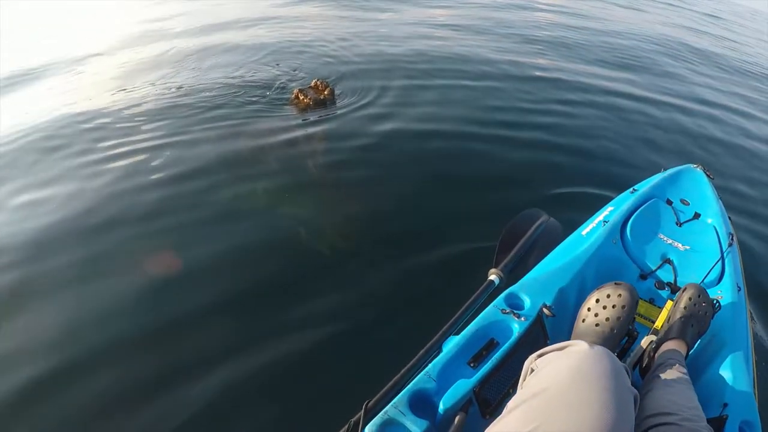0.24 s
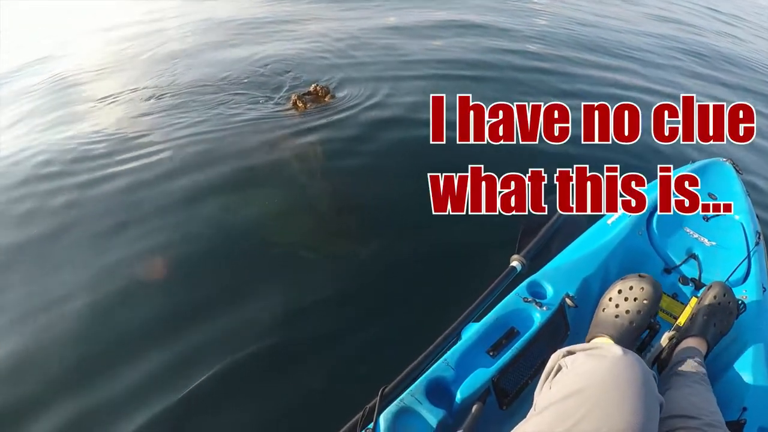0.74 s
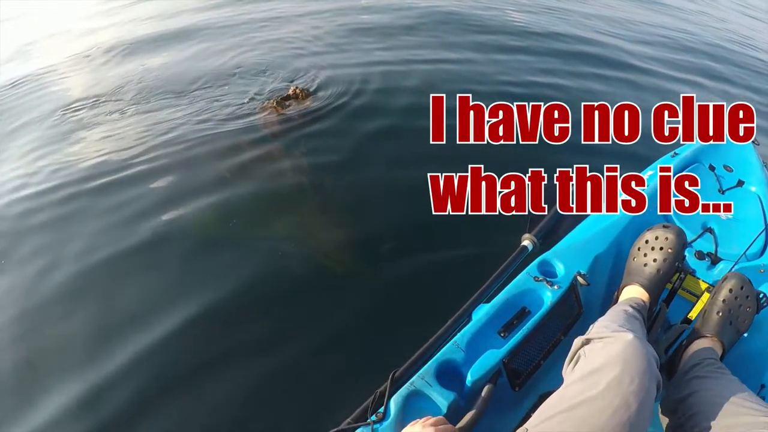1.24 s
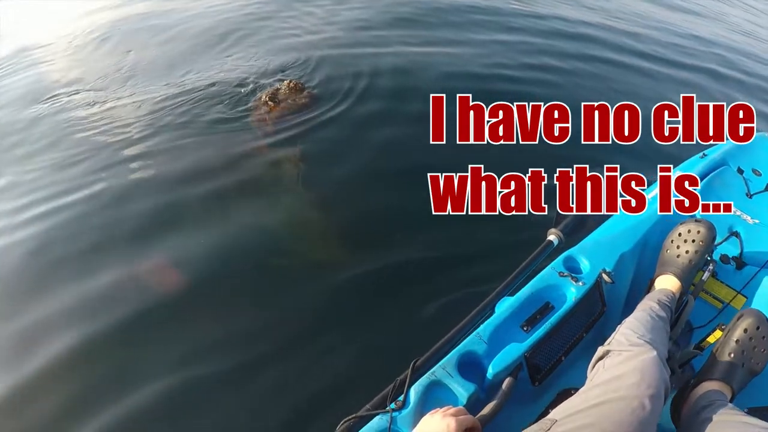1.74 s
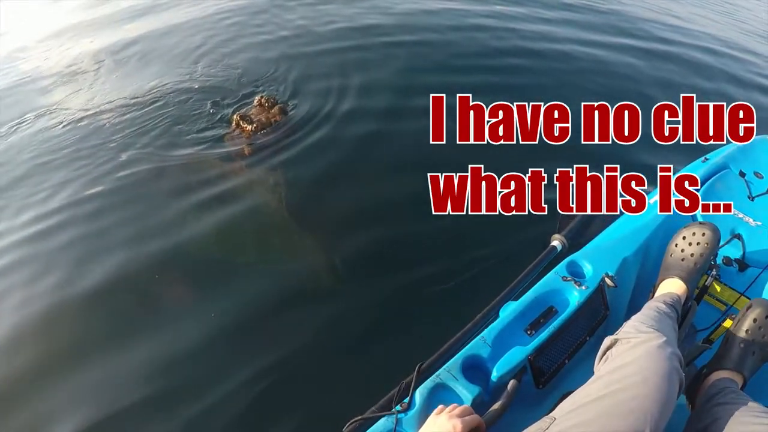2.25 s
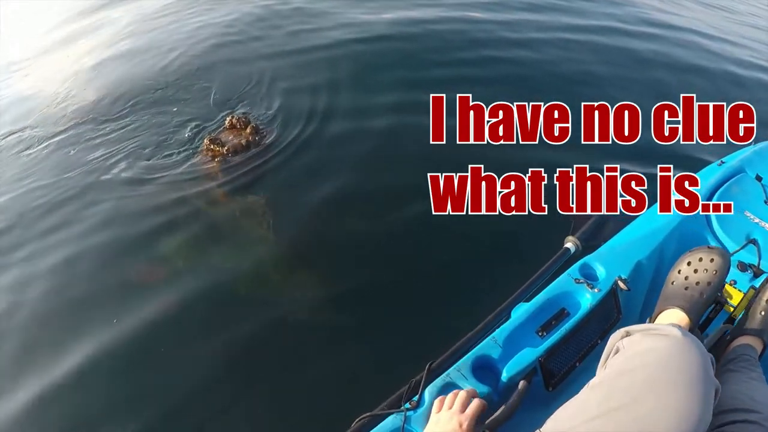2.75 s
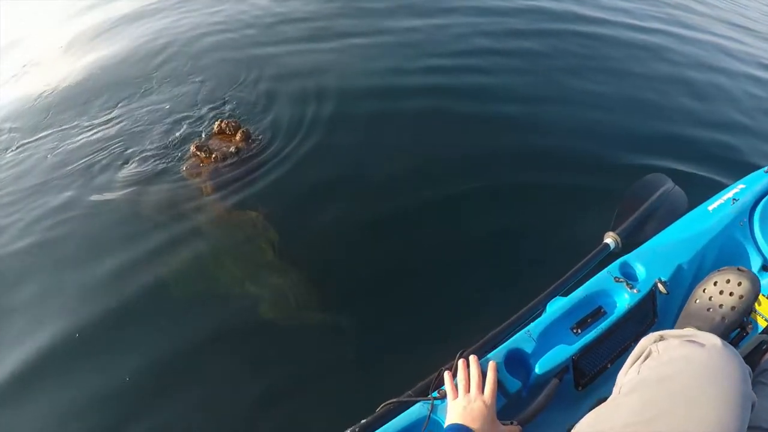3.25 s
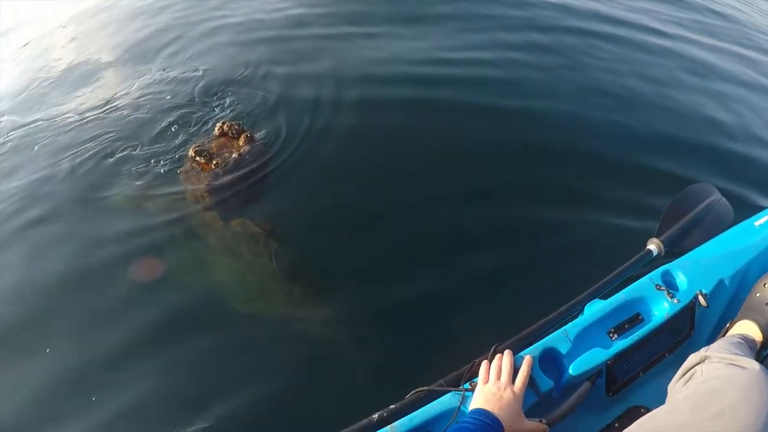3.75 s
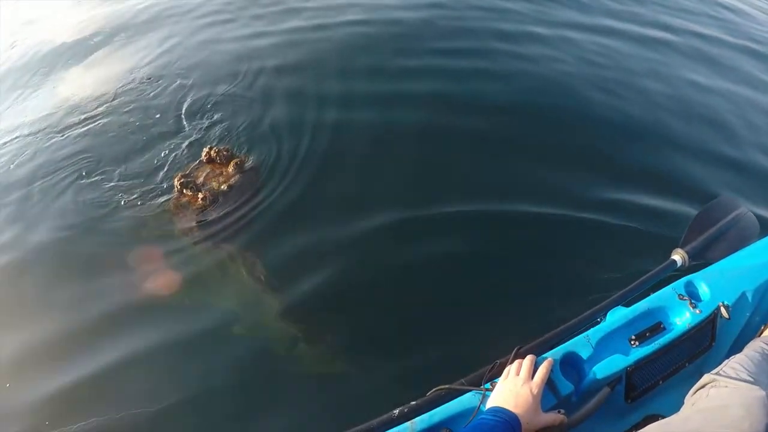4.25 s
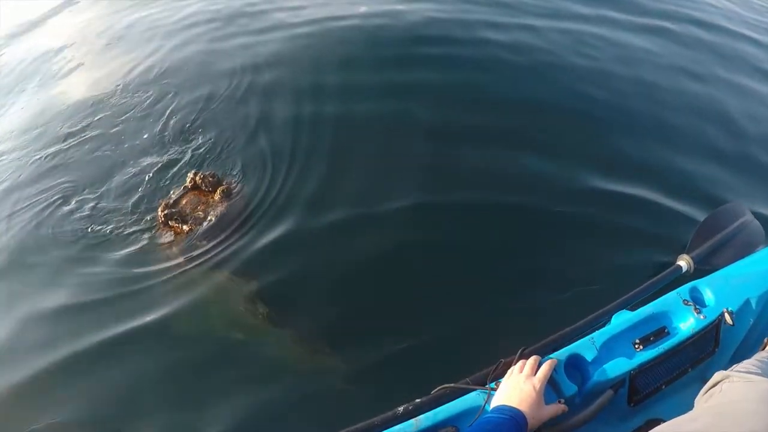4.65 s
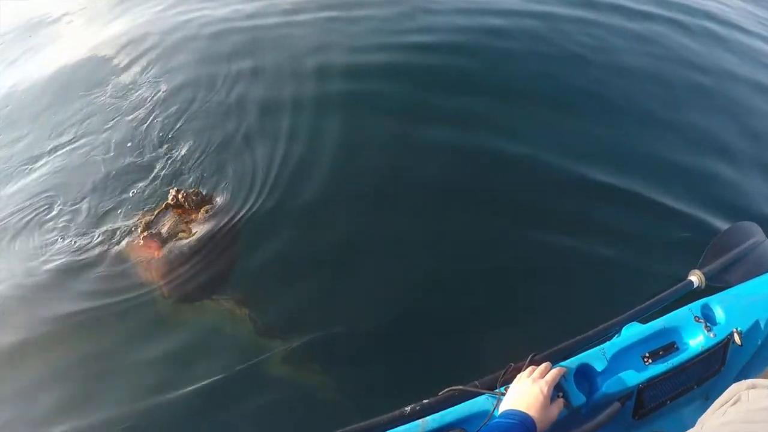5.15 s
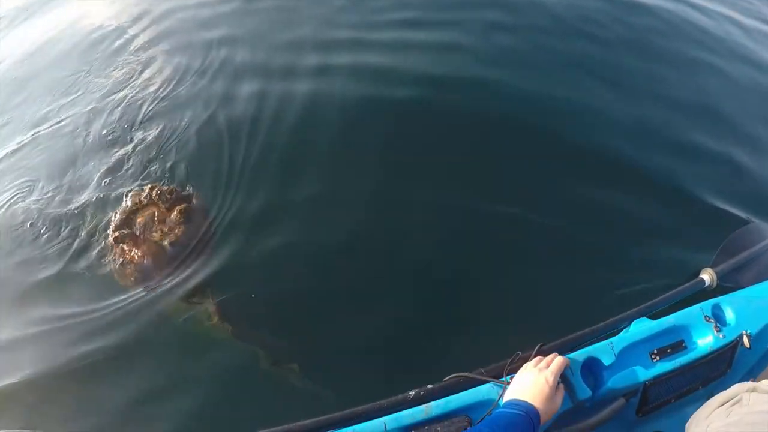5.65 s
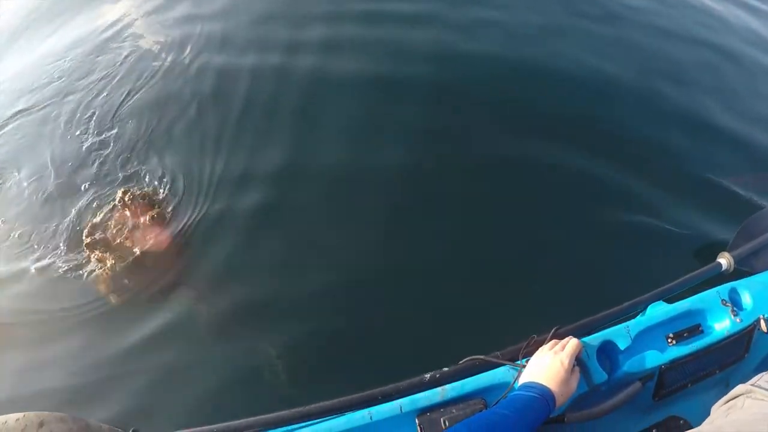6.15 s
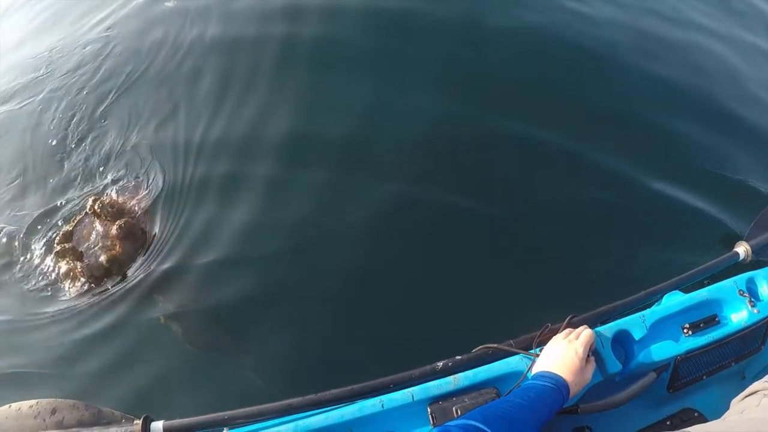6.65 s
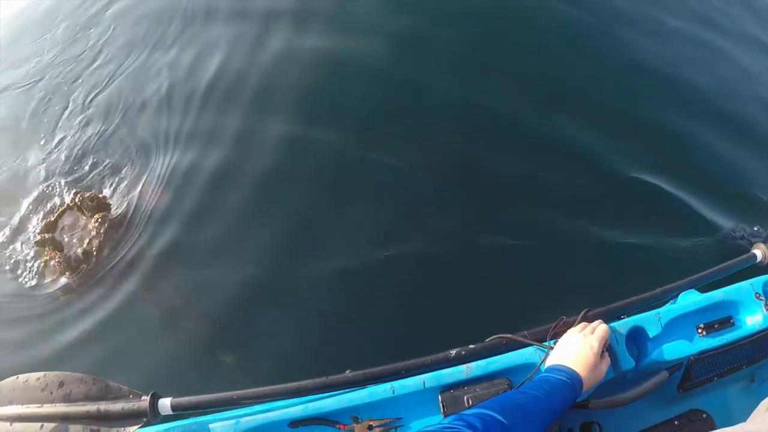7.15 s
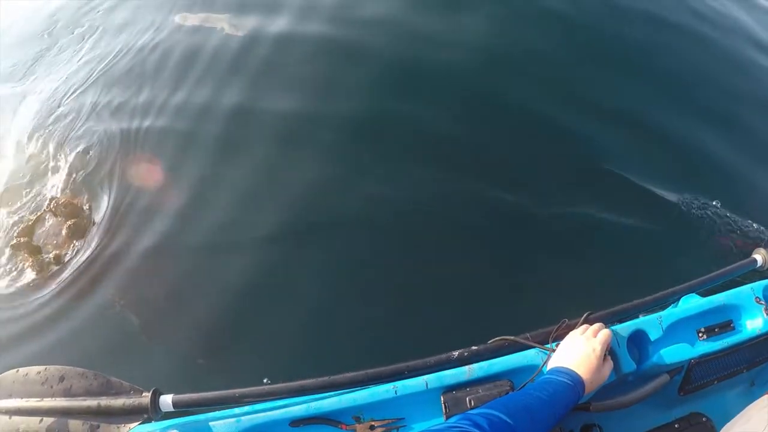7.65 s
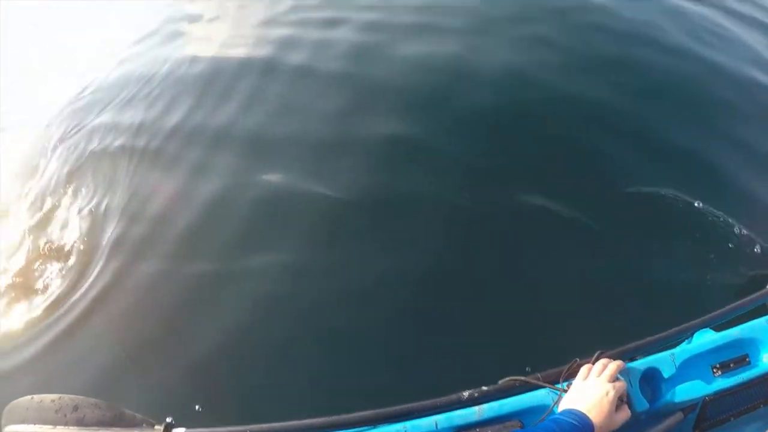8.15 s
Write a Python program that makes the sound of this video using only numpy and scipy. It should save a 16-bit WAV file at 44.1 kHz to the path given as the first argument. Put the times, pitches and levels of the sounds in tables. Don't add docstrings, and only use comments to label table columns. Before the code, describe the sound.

Throughout, soft microphone hiss lies under close water noise: low hollow booms around a plastic hull, soft slaps, gurgling and tiny bubbles. From 0.05 to about 0.4 s a strap drags in quickening scrapes. Fine spray ticks near 1 s, and two plastic taps come at about 1.3 s. Strong thumps follow near 1.8-2 s; the seat creaks from 2.14 s and breaks loose with a loud crack at 2.2 s, with tiny squeaks. From 2.5 to 3.1 s strap slips chatter rapidly and fuse into a rub. Around 3.8 s gear knocks with a hard slap, then a buckle stutters at 3.9-4 s over a heavy boom. A short rising wet-rubber squeak comes at 4.5 s, a double knock at 4.64 s. Afterwards water dominates: glugs from 5.4 s, drips and splashes around 6-7 s, a sharp slap near 7.7 s, then trickling to the end at about 8.4 s.

```python
import sys
import numpy as np
from scipy import signal
from scipy.fft import rfft, irfft
from scipy.io import wavfile
from scipy.ndimage import uniform_filter1d

SR = 44100
rng = np.random.default_rng(int(sys.argv[2]) if len(sys.argv) > 2 else 0)


def voltage_ratio(decibels):
    exponent = np.asarray(decibels, float) / 20
    return 10 ** exponent


def persist_wave(psi):
    counts = np.round(np.clip(psi, -1, 1) * 32767).astype(np.int16)
    wavfile.write(sys.argv[1], SR, np.atleast_2d(counts).T)


N = 370440

# (frequency [Hz], left lead [rad])
PORT_PHASE = [(60, 0), (340, .6), (1460, 0), (2400, .4), (3100, 2.4), (5200, 5), (7200, 6.5)]
# (frequency [Hz], left over right [dB])
PORT_DB = [(60, -2), (170, -2), (500, 3), (900, 2.5), (2450, -.5), (4200, -4.5), (7000, -1.)]


def evened(x):
    return x / np.sqrt(np.mean(x ** 2) + 1e-20)


def read(points, hz):
    f, value = np.transpose(points)
    return np.interp(np.log(hz + 1), np.log(f + 1), value)


def curve(rows):
    return np.interp(np.arange(N) / SR, *np.transpose(rows))


def add(mix, s, sound):
    part = mix[..., round(s * SR):][..., :sound.shape[-1]]
    part += sound[..., :part.shape[-1]]


def coloured(x, spectrum):
    hz = np.fft.rfftfreq(x.shape[-1], 1 / SR)
    return irfft(rfft(x) * voltage_ratio(read(spectrum, hz)), x.shape[-1])


def body(x, modes, widen=0.76):
    out = 0
    for k, (hz, width, db) in enumerate(modes):
        r = np.exp(-np.pi * abs(width * widen) / SR)
        turn = 2 * np.pi * hz / SR
        ring = signal.lfilter([(1 - r) * np.sin(turn)], [1, -2 * r * np.cos(turn), r * r], x)
        out = out + (-1) ** k * voltage_ratio(db) * ring
    return out


def ports(x, other, same, phase=PORT_PHASE, balance=PORT_DB):
    hz = np.fft.rfftfreq(N, 1 / SR)
    same = np.clip(same, 0, 1)
    half = voltage_ratio(read(balance, hz) / 2) * np.exp(.5j * read(phase, hz))
    right = same * x + np.sqrt(1 - same ** 2) * other
    return np.array([irfft(rfft(x) * half, N), irfft(rfft(right) / half, N)])


def blows(table, rise, stretch):
    out = np.zeros(N)
    for s, db, hz, length in table:
        size = stretch * max(length, 1.33 / hz)
        u = np.arange(-size, 5 * size, 1 / SR) / size
        swell = (1 + u) ** 2 * np.exp(-2 * u)
        turns = hz * size * (u + rise * u ** 2 / 2) + rng.random()
        add(out, max(s - size, 0), voltage_ratio(db) * swell * np.sin(2 * np.pi * turns))
    return out


def lumps(per_s, spread_db):
    place, size, sign = rng.random((3, 2, round(per_s * N / SR)))
    push = voltage_ratio(spread_db * np.minimum(-np.log(1 - size), 4)) * np.sign(sign - .5)
    out = np.zeros((2, N))
    np.put_along_axis(out, (place * N).astype(int), push, 1)
    return out


def booms():
    # (time of the peak [s], peak level [dB], pitch [Hz])
    thumps = [(0.299, -25.5, 101), (0.588, -26, 113.4), (0.824, -34, 96.7), (0.883, -27, 108),
              (1.299, -38, 141), (1.778, -22.5, 96), (1.976, -21.5, 99.6), (2.201, -27, 129.3),
              (2.248, -24, 99.7), (2.315, -23.5, 90.8), (3.054, -25, 113.3), (3.098, -27, 90),
              (3.221, -24.5, 113.7), (3.415, -24, 114.3), (3.466, -28.5, 130.7), (3.511, -25.5, 115),
              (3.832, -34, 109.4), (3.875, -27.5, 100.4), (3.996, -17.5, 94), (4.289, -22.5, 97.8),
              (4.477, -26.5, 89), (4.626, -24, 94.8), (4.683, -31.5, 115.4), (5.515, -24, 100),
              (6.373, -20.5, 87.2), (6.525, -30, 113.7), (6.568, -24, 104), (6.839, -28, 90),
              (7.552, -31.5, 114.5), (7.755, -24.5, 92)]
    return [(s, db, hz, 0.016 * voltage_ratio(0.62 * (-25.5 - db))) for s, db, hz in thumps]


def slaps():
    # (time of the peak [s], peak level [dB], length [s])
    hits = [(0.267, -35, 0.034), (0.583, -26.5, 0.021), (0.872, -28, 0.034), (1.752, -30.5, 0.0098),
            (1.934, -25, 0.017), (2.035, -30, 0.01), (2.2, -27.5, 0.0065), (2.241, -23, 0.017),
            (3.018, -30, 0.014), (3.195, -25, 0.024), (3.23, -25, 0.014), (3.402, -23, 0.0022),
            (3.441, -24, 0.021), (3.819, -17, 0.0094), (3.953, -30, 0.033), (3.988, -16.5, 0.0034),
            (4.261, -29.5, 0.017), (4.433, -24, 0.021), (4.605, -28, 0.0094), (4.658, -22, 0.0092),
            (5.463, -25.5, 0.014), (5.697, -24.5, 0.0092), (6.327, -28, 0.0063), (6.509, -22.5, 0.012),
            (6.587, -28, 0.015), (6.598, -30.5, 0.0034), (6.841, -25, 0.019), (7.732, -19, 0.005),
            (7.756, -22, 0.013)]
    return [(s, db, 187.6 + 90 * np.exp(-length / 0.0051), length) for s, db, length in hits]


def stirred(lag):
    power = (blows(booms(), 0, 0.93) + 2 * blows(slaps(), 0, 1.0)) ** 2
    keep = np.exp(-1 / (lag * SR))
    return np.sqrt(signal.lfilter([1 - keep], [1, -keep], power)) / voltage_ratio(-10)


def hull():
    # (time [s], gurgle level [dB])
    gurgle = [(0.0, -51), (0.33, -50), (0.82, -47.5), (1.12, -57.5), (2.03, -54), (2.42, -57), (2.74, -44),
              (3.11, -53.5), (3.34, -50.5), (4.49, -47.5), (4.91, -50.5), (5.52, -45), (5.96, -48),
              (6.36, -44.5), (6.95, -51.5), (7.37, -53.5), (8.24, -46.5), (8.4, -56.5)]
    # (frequency [Hz], width [Hz], level [dB])
    hollow = [(86.6, 19.8, -1), (133.3, 18, -3.5), (59, 88, -16.5)]
    # (frequency [Hz], width [Hz], level [dB])
    pockets = [(156.8, 143, 3), (290, 94, 2.5), (411, 216, -3), (704, 135, -7)]
    # (time of the peak [s], peak level [dB], pitch [Hz])
    glugs = [(0.862, -35.5, 690), (0.907, -32, 494), (1.528, -30, 413), (3.434, -32, 490),
             (3.751, -32.5, 740), (4.416, -38, 545), (5.414, -36.5, 500), (5.698, -37, 460),
             (5.769, -33.5, 616), (6.008, -33, 378), (6.05, -31.5, 334), (6.158, -34.5, 436),
             (6.21, -35.5, 526), (6.472, -31.5, 650), (6.517, -38, 482), (6.559, -34.5, 590),
             (7.499, -33.5, 406), (7.721, -35.5, 442), (7.975, -33.5, 704), (.491, -38.5, 706),
             (.53, -40.5, 480), (7.55, -37, 666), (7.595, -43, 560), (7.921, -37, 800)]
    # (time of the peak [s], peak level [dB], pitch [Hz], length [s])
    gulp = [
        (5.641, -26, 492, 0.02),
    ]
    # (time of the peak [s], peak level [dB], pitch [Hz], length [s])
    glides = [
        (1.549, -41, 620, 0.008),
    ]

    gurgle_db = curve(gurgle)
    hum = evened(body(body(lumps(260, 3.5)[0], hollow), hollow, widen=4.0))
    hum = voltage_ratio(-44 + 0.18 * (gurgle_db - gurgle_db.mean())) * hum
    slosh = evened(body(body(lumps(260, 2.44), pockets, widen=0.95), pockets, widen=6.07))
    slosh = voltage_ratio(gurgle_db + 3.0) * (1 + 9.4 * stirred(lag=0.006)) * slosh
    glugs = [(s, db, hz, 2.5 / hz) for s, db, hz in glugs] + gulp
    waves = blows(booms(), 0.0038, 0.94) + blows(slaps(), 0.0067, 0.43)
    waves = waves + blows(glugs, 0.2, 0.9) + blows(glides, 0.44, 0.89)
    return ports(hum + waves, hum + waves, 1) + ports(*slosh, 0.55)


def laps():
    # (time of the peak [s], peak level [dB], pitch [Hz])
    soft = [(0.07, -39.5, 90), (0.161, -47, 192), (0.378, -37.5, 90), (0.63, -30.5, 108), (.76, -37.5, 290),
            (0.802, -35, 186), (0.821, -39.5, 310), (0.927, -42, 298), (1.131, -42, 533),
            (1.351, -33.5, 142.7), (1.442, -34, 103.3), (1.537, -38.5, 435), (2.171, -41, 335),
            (2.285, -29.5, 197), (3.266, -29, 107.7), (3.347, -39, 262), (3.485, -31, 178),
            (3.544, -39, 128.5), (3.857, -35.5, 156.5), (4.059, -31, 115), (4.166, -39.5, 385),
            (4.334, -42.5, 298), (4.383, -27, 129), (4.452, -28.5, 147), (4.56, -32.5, 102.3),
            (4.808, -41.5, 101.8), (4.988, -36.5, 253), (5.23, -35, 323), (5.33, -33.5, 124),
            (5.487, -30, 140.4), (5.595, -37.5, 510), (5.671, -30, 105), (5.727, -29.5, 105.8),
            (5.758, -43.5, 106.4), (5.844, -37.5, 105.4), (5.845, -41.5, 534), (6.118, -31.5, 290),
            (6.19, -37, 322), (6.426, -27, 85.7), (6.709, -43, 464), (6.873, -36.5, 304), (6.889, -32, 90),
            (6.998, -33.5, 82.3), (7.786, -28.5, 120), (7.831, -42, 124), (8.013, -32.5, 95),
            (8.165, -35.5, 114.3), (8.335, -40, 622)]
    ring = blows([(*row, 0.024) for row in soft], 0.055, 0.7)
    return ports(ring, ring, 1)


def bubble(hz, cycles, rise):
    u = np.arange(2400) / SR * hz / cycles
    tone = np.sin(2 * np.pi * cycles * (u + rise * u ** 2 / 2))
    return tone * (1 - np.exp(-u / 0.018)) * np.exp(-2.5 * u) * 2.45


def trickle():
    # (frequency [Hz], level per Hz [dB])
    spectrum = [(260, -36.5), (450, -2.5), (886, -15), (1110, -18), (2000, -21.5), (7000, -46), (9100, -72),
                (15400, -120)]
    # (time [s], level [dB])
    runoff = [(0, -57.5), (.6, -53), (1.2, -53.5), (2.03, -72), (2.7, -54.5), (3.3, -55.5), (3.43, -47),
              (3.65, -50), (5.0, -53), (6.2, -45), (7.1, -52), (8.4, -44.5)]
    out = np.zeros((2, N))
    for hz in np.geomspace(500, 5200, num=16):
        cycles = rng.uniform(3, 14)
        grain = bubble(hz, cycles, rng.uniform(0, 0.2))[:round(4 * SR * cycles / hz)]
        grain = grain * voltage_ratio(read(spectrum, hz)) * hz ** 1.164
        out += signal.oaconvolve(lumps(85, 4.2), grain[None], axes=1)[:, :N]
    flurries = uniform_filter1d(rng.standard_normal(N), size=500)
    flurries = evened(uniform_filter1d(flurries, size=500))
    flow = voltage_ratio(curve(runoff) + 2.5) * (1 + 1.6 * stirred(lag=0.0086))
    return ports(*(flow * evened(voltage_ratio(2.1 * flurries) * out)), 0.05)


def plips():
    # (time [s], peak level [dB], pitch [Hz])
    pops = [(.36, -41, 1500), (0.421, -47.5, 800), (.529, -45, 950), (.652, -42.5, 756), (0.74, -51, 1860),
            (.787, -51, 1800), (0.807, -58, 1900), (.856, -47.5, 1090), (0.994, -44.5, 2150),
            (1.027, -49, 1820), (1.207, -50, 2240), (1.383, -48.5, 3130), (1.432, -42, 1910),
            (1.446, -36.5, 2740), (1.535, -38, 3680), (1.614, -46.5, 2330), (1.902, -48, 2160),
            (3.141, -44.5, 1670), (3.144, -43.5, 2800), (3.2, -45, 1440), (3.263, -47.5, 3300),
            (3.284, -48, 1870), (3.32, -48, 2750), (3.392, -42.5, 2050), (3.654, -45.5, 2000),
            (4.22, -50, 3500), (4.319, -49.5, 1730), (4.405, -50, 1500), (4.813, -42, 2180),
            (4.866, -51.5, 1320), (4.889, -50.5, 2600), (4.915, -49, 2650), (5.092, -47, 1004),
            (5.139, -52, 2130), (5.669, -46, 1980), (5.737, -39.5, 2690), (5.764, -45.5, 2100),
            (5.833, -47, 2750), (5.845, -52, 1250), (5.925, -43, 1910), (5.962, -43.5, 3080),
            (6.146, -44.5, 1550), (6.388, -51, 2340), (6.425, -42.5, 2440), (6.514, -40, 2370),
            (6.697, -45, 1900), (6.93, -42, 2090), (6.958, -46, 1250), (7.08, -47, 3050),
            (7.119, -40, 1520), (7.283, -42, 2580), (7.4, -41.5, 1600), (7.581, -41, 1300),
            (7.833, -54, 2010), (8.136, -45.5, 1150), (8.272, -36.5, 2460), (8.286, -39.5, 1140)]
    out, t = np.zeros((2, N)), np.arange(2400) / SR
    for s, db, hz in pops:
        fizz = body(rng.standard_normal(2400) * np.exp(-t / 0.0027), [(hz, 1500, 0)])
        pop = bubble(hz, 12, 0.012) + .5 * fizz / abs(fizz).max()
        add(out, s, voltage_ratio(db + np.array([[1], [-1]]) * rng.uniform(-2, 2)) * pop)
    return out


def drips():
    # (time [s], peak level [dB], pitch [Hz], left over right [dB])
    drops = [(1.1162, -39.5, 1410, 3), (1.417, -46, 1860, 1), (1.567, -32.5, 1118, 5.5),
             (3.5755, -44, 1120, 8), (3.017, -47, 4100, 3), (5.678, -42.5, 985, -1),
             (5.718, -40.5, 1066, -14), (5.8988, -50, 970, 11), (6.0237, -41, 1780, -9),
             (6.2065, -42.5, 1090, -21), (6.252, -43, 2050, 6), (6.488, -41.5, 1530, 7),
             (6.559, -43.5, 1300, 15), (6.604, -37.5, 907, 13), (6.6708, -42.5, 1020, 8),
             (6.775, -44, 1010, 19), (6.834, -40.5, 2050, 8.5), (7.348, -41.5, 3370, -2),
             (7.454, -41.5, 1740, 1), (7.4886, -39.5, 1430, 8.5), (7.5196, -42, 1640, 3),
             (8.2486, -38.5, 1900, 0), (8.36, -37, 933, -13)]
    out, t = np.zeros((2, N)), np.arange(2400) / SR
    for s, db, hz, pan_db in drops:
        tick = body(rng.standard_normal(2400) * np.exp(-t / 0.0041), [(1.7 * hz, 1800, 0)])
        tick = .75 * tick / abs(tick).max()
        add(out, s, voltage_ratio(db + np.array([[.5], [-.5]]) * pan_db) * (bubble(hz, 16.4, 0.077) + tick))
    return out + blows([(6.772, -36.5, 2560, .005)], -0.2, 1)


def spray():
    # (time of the peak [s], peak level [dB], length [s])
    splashes = [(0.923, -35, 0.0007), (0.938, -40.5, 0.0095), (1.01, -32.5, 0), (1.418, -41.5, 0.0033),
                (1.432, -49, 0.054), (1.508, -41, .0063), (1.526, -42.5, 0.036), (1.68, -42.5, 0.0083),
                (5.385, -36.5, 0.008), (5.359, -38, 0), (5.334, -43.5, 0.0032), (5.688, -41, 0.0058),
                (5.875, -40.5, 0.0016), (6.001, -45.5, 0.04), (6.604, -36.5, 0.014), (6.762, -29, 0),
                (6.768, -36, 0), (6.786, -39.5, .012), (6.794, -49, 0.027), (6.841, -33.5, 0.0039),
                (6.675, -42.5, 0.0034), (6.494, -52, 0.028), (6.554, -49, 0.023), (7.623, -45, .012),
                (7.965, -48, .02), (8.05, -47, 0.008), (8.164, -48, 0.033), (8.355, -42, 0.0054),
                (8.199, -35.5, 0.0031), (8.29, -44, 0.028), (3.397, -43.5, 0.012)]
    out, t = np.zeros((2, N)), np.arange(2400) / SR
    for s, db, length in splashes:
        hz = 2760 + 800 * np.exp(-length / 0.004)
        burst = rng.standard_normal((2, 2400)) * np.exp(-t / (0.00072 + 0.97 * length))
        burst = burst + 0.038 * burst[::-1]
        burst = body(burst, [(hz, 20.0 / (length + 0.0054), 0), (hz * 0.32, 900, -8)])
        burst = body(burst, [(hz, 3500, 0)])
        add(out, s - .001, voltage_ratio(db + 7.5) * burst / abs(burst).max())
    return out


def strikes(table, modes, ms, click=10.0):
    out, t = np.zeros(N), np.arange(2000) / SR
    for s, db in table:
        u = t * 1000 / (ms * voltage_ratio(0.6 * (db + 51.5)))
        scrape = rng.standard_normal(2000) * np.exp(-u) * (1.53 + u)
        ring = body(scrape + click * (t == 0), modes)
        add(out, s, voltage_ratio(db) * ring / abs(ring).max())
    return out


def dragged(run, pull):
    start, count, gap, ratio = run
    k = np.arange(count)
    times = start + gap * (np.cumsum(ratio ** k) - ratio ** k)
    return list(zip(times, np.interp(k / (count - 1), [0, 0.21, 1], pull)))


def strap_slips():
    # (start [s], slips [count], first gap [s], each gap to the one before [ratio])
    runs = [
        (.057, 10, .045, .91),
        (2.504, 5, .0183, 1.),
    ]
    # (first level [dB], hardest level [dB], last level [dB])
    pulls = [(-27.5, -25, -36.5), (-28.5, -25, -25.5)]
    # (time [s], peak level [dB])
    single = [(2.6, -23.5), (2.63, -22), (2.654, -26.5), (2.666, -24), (2.689, -26), (2.698, -23),
              (2.727, -22.5), (2.759, -21), (2.782, -24.5), (2.801, -23.5), (2.818, -25), (2.838, -24.5),
              (3.034, -32)]
    # (frequency [Hz], width [Hz], level [dB])
    shell = [(830, 530, 0), (1500, 330, 0), (2050, 460, -4), (3056, 420, 2), (3850, 5200, -20.5)]
    first, second = map(dragged, runs, pulls)
    return strikes(first + second + single, shell, 0.9)


def thrum(slips):
    return voltage_ratio(-55.5) * evened(body(abs(slips), [(193.0, 26, 0)]))


def buckle():
    # (time [s], peak level [dB])
    buzz = [(3.9, -31), (3.909, -24), (3.919, -26.5), (3.929, -24), (3.939, -23.5), (3.95, -20),
            (3.964, -22), (3.976, -18.5), (3.99, -24), (4.0, -21), (4.014, -27), (4.066, -42), (4.09, -45)]
    # (frequency [Hz], width [Hz], level [dB])
    buckle_modes = [(680, 290, 3), (1046, 150, 1.5), (1800, 650, -5), (2900, 450, -6), (3790, 420, -6)]
    # (time [s], peak level [dB])
    taps = [
        (1.277, -24),
        (1.338, -25),
    ]
    # (frequency [Hz], width [Hz], level [dB])
    deck = [(735, 850, 6), (1250, 340, 10), (1910, 1350, -0.5)]
    rings = blows([(s + 0.0033, db - 7.5, 1140, .0042) for s, db in buzz], 0, 0.54)
    return strikes(buzz, buckle_modes, .5, click=28.) + rings + strikes(taps, deck, 0.58)


def creaks():
    # (time [s], level [dB], slips per second [1/s])
    rubs = [
        [(2.141, -42, 81), (2.146, -32, 180), (2.18, -26.5, 81), (2.196, -29, 140), (2.212, -25, 210),
         (2.222, -32.5, 440), (2.232, -33, 390), (2.255, -59, 190)],
        [(2.76, -75, 95), (2.81, -51, 120), (2.85, -36, 130), (2.92, -36.5, 250), (2.96, -44.5, 84),
         (3.01, -48, 53), (3.05, -46.5, 190)],
        [(4.015, -43.5, 130), (4.055, -43.5, 150), (4.068, -36, 140), (4.095, -41, 110), (4.104, -48.5, 120),
         (4.135, -46, 99)],
    ]
    # (frequency [Hz], width [Hz], level [dB])
    seat = [(723, 85, 3), (886, 60, 3), (1120, 120, -6), (1500, 150, -7.5), (2100, 270, -11),
            (2930, 400, -8), (4010, 2500, -25)]
    # (frequency [Hz], width [Hz], level [dB])
    fused = [(885, 470, 3.5), (1450, 150, 7), (2100, 500, -2.5), (3040, 470, 5), (3960, 1800, -8)]
    # (frequency [Hz], width [Hz], level [dB])
    last = [(950, 660, -2), (1600, 1200, 0.5), (3000, 530, 2), (4100, 1100, -3)]
    steady = (.7, .6, .8)
    out = np.zeros(N)
    for rows, modes, drag in zip(rubs, (seat, fused, last), steady):
        s, *columns = np.transpose(rows)
        t = np.arange(s[0], s[-1], 1 / SR)
        db, per_s = (np.interp(t, s, c) for c in columns)
        uneven = 1 + 3.5 * uniform_filter1d(rng.standard_normal(len(t)), size=300)
        turns = np.cumsum(per_s * uneven) / SR
        scrape = (drag + np.exp(-(turns % 1) / .22)) * rng.standard_normal(len(t))
        add(out, s[0], voltage_ratio(db) * evened(body(scrape, modes)))
    return out


def seat_gives():
    # (time [s], peak level [dB])
    gives = [
        (2.142, -23.5),
        (2.149, -23.5),
        (2.161, -22.5),
        (2.173, -22),
        (2.181, -16.5),
        (2.1945, -20.5),
        (2.199, -7.5),
        (2.2055, -17.5),
        (2.21, -21.5),
    ]
    # (frequency [Hz], width [Hz], level [dB])
    frame = [(750, 70, 0), (1110, 70, -13), (1490, 90, -15)]
    out, t = np.zeros(N), np.arange(2000) / SR
    push = np.exp(-((t - .002) / 0.00023) ** 2)
    jolt = body(push, frame, widen=1) * (1 - np.exp(-t / .004)) ** 2
    for s, db in gives:
        add(out, s, voltage_ratio(db) * jolt / abs(jolt).max())
    return out


def squeaks():
    # (time [s], pitch [Hz], level [dB])
    glissandi = [
        [(2.193, 1380, -30), (2.201, 1600, -23), (2.208, 1800, -30)],
        [(2.208, 1420, -30), (2.214, 1680, -24), (2.222, 1900, -31)],
        [(4.503, 603, -48), (4.512, 718, -31.5), (4.53, 1348, -31.5), (4.545, 1947, -39), (4.56, 2650, -43)],
    ]
    shares = (0.097, 0.099, 0.69)
    out = np.zeros(N)
    for rows, share in zip(glissandi, shares):
        s, hz, db = np.transpose(rows)
        t = np.arange(s[0], s[-1], 1 / SR)
        wobble = 1 + 0.25 * uniform_filter1d(rng.standard_normal(len(t)), size=40)
        turns = np.cumsum(np.interp(t, s, hz) * wobble) / SR
        tone = sum(voltage_ratio(-13 * k) * np.sin(2 * np.pi * (k + 1) * turns) for k in range(3))
        rasp = body(rng.standard_normal(len(t)), [(2550, 5000, 0.067), (3950, 2000, .1)])
        add(out, s[0], voltage_ratio(np.interp(t, s, db)) * (tone + share * evened(rasp)))
    return out


def knocks():
    # (time [s], peak level [dB])
    hits = [
        (3.749, -45.5),
        (3.809, -21),
        (3.815, -16),
        (4.634, -20.5),
        (4.643, -24),
    ]
    # (frequency [Hz], width [Hz], level [dB])
    modes = [(326, 180, -2.5), (880, 690, -3), (1074, 180, 1), (1410, 160, -15.5), (2580, 3600, -16),
             (3700, 1700, -16.5)]
    return strikes(hits, modes, 0.56)


def gear(slips):
    # (frequency [Hz], left lead [rad])
    gear_phase = [(260, -.1), (690, 1.6), (1120, .6), (1720, .8), (2410, -1.8), (4050, -2.9), (5250, 1.2)]
    # (frequency [Hz], left over right [dB])
    gear_db = [(300, -11), (800, -7.5), (1400, -13), (2200, -2), (2900, 4), (4000, -12.5), (4700, -14.5),
               (5600, 1.5)]
    thin = slips + buckle() + creaks() + seat_gives() + squeaks()
    thin = signal.sosfilt(signal.butter(4, 540, "high", fs=SR, output="sos"), thin)
    direct = thin + knocks()
    echo = rng.standard_normal(1200) * np.exp(-np.arange(1200) / 160.)
    wet = signal.oaconvolve(direct, echo / np.linalg.norm(echo))[:N]
    return ports(direct + voltage_ratio(-21) * wet, wet, .988, gear_phase, gear_db)


def hiss():
    # (frequency [Hz], level per Hz [dB])
    spectrum = [(20, -28), (103, -7.5), (251, -15.5), (629, -22.5), (2400, -31.5), (6810, -32),
                (7520, -34.5), (9780, -102)]
    noise = coloured(rng.standard_normal((2, N)), spectrum)
    return voltage_ratio(-47) * evened(ports(*noise, 0.012))


def scene():
    slips = strap_slips()
    water = hull() + laps() + trickle() + plips() + drips() + spray()
    return water + gear(slips) + thrum(slips) + hiss()


def patchy_treble(x):
    hz, _, z = signal.stft(x, SR, nperseg=1024)
    chance = uniform_filter1d(rng.standard_normal(z.shape[1:]), size=4, axis=0)
    chance = uniform_filter1d(chance, size=7, axis=1)
    kept = evened(chance) > np.interp(hz, [4600, 5800, 7000, 7700], [-2.4, -.6, .2, 1.2])[:, None]
    return signal.istft(z * np.where(kept, 1, .012), SR, nperseg=1024)[1][:, :N]


def air_and_ticks():
    # (time [s], peak level [dB])
    ticks = [(1.1236, -66), (1.9576, -69), (2.2078, -53.5), (2.6648, -59.5), (2.7928, -66.5), (2.807, -58),
             (3.3915, -72.5), (3.523, -68), (3.7584, -62.5), (3.8741, -71), (4.5902, -72), (5.907, -64),
             (6.0425, -63), (6.5084, -66.5), (6.623, -67.5), (6.759, -64), (7.591, -65), (7.8241, -68),
             (8.274, -67.5)]
    air = voltage_ratio(-91) * coloured(rng.standard_normal((2, N)), [(8800, -12), (9800, 0), (15000, -2)])
    for s, db in ticks:
        add(air, s, voltage_ratio(db - 1.5) * rng.standard_normal((1, 30)))
    return air


def low_pass(x):
    return signal.sosfilt(signal.butter(12, 15720, fs=SR, output="sos"), x)


def record(dry):
    housing = [(20, -17), (52, -30), (75, 0.5), (5000, -2.5), (6300, -10.5), (7600, -8),
               (8000, -47.5), (16000, -46)]
    return low_pass(patchy_treble(coloured(dry, housing)) + air_and_ticks())


dry = scene()
out = record(dry)
persist_wave(out)
```